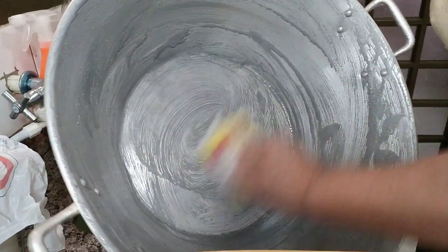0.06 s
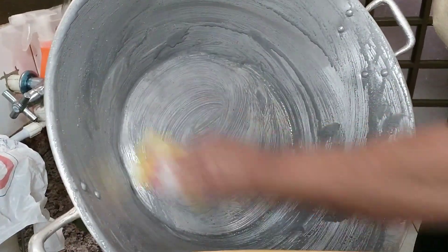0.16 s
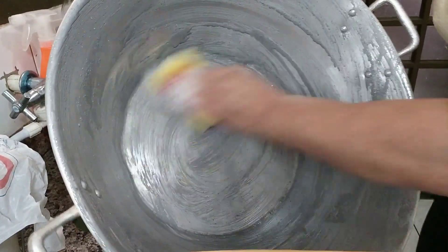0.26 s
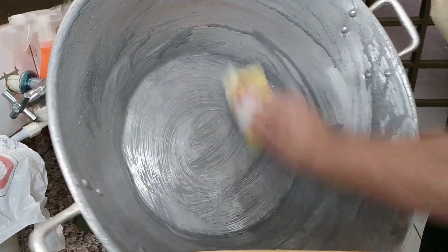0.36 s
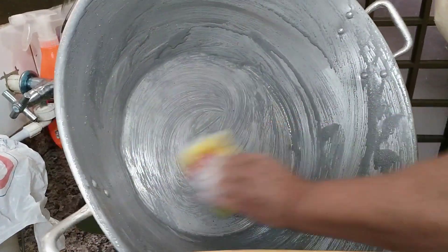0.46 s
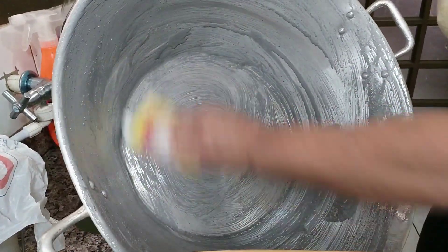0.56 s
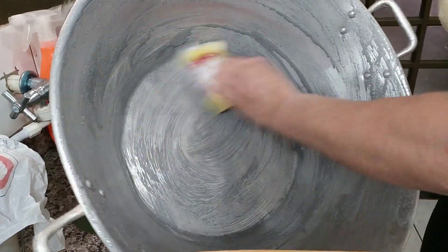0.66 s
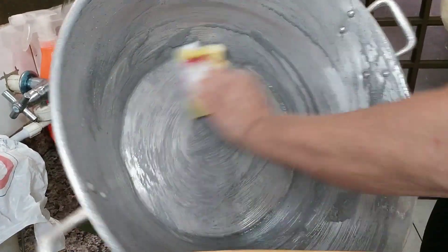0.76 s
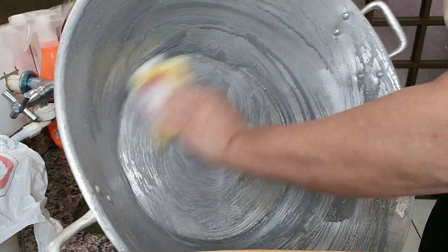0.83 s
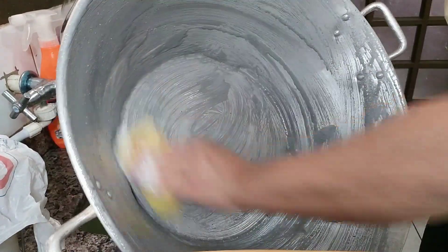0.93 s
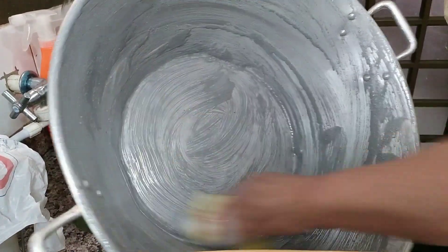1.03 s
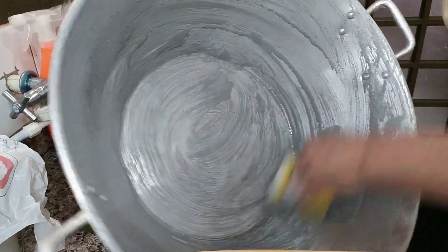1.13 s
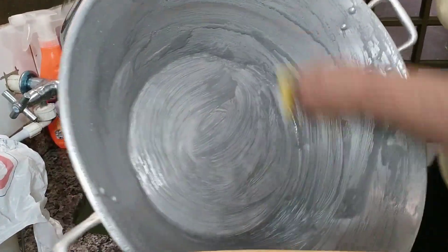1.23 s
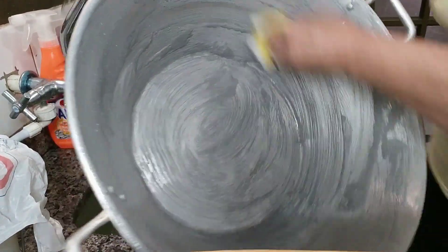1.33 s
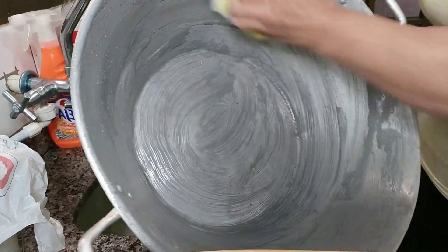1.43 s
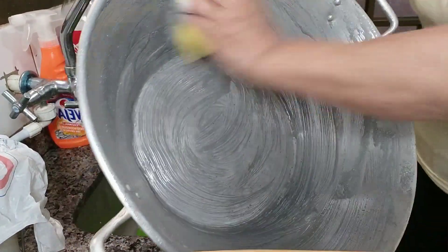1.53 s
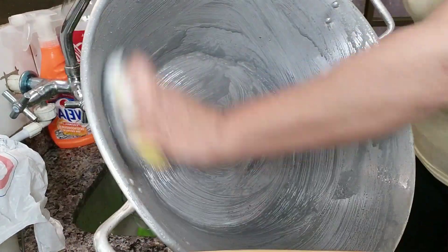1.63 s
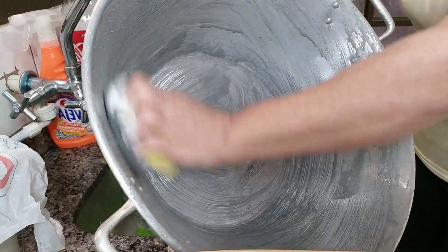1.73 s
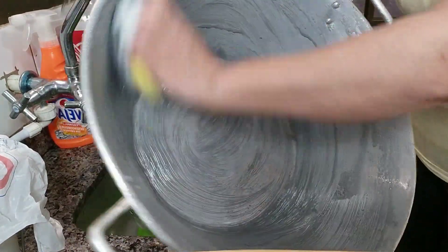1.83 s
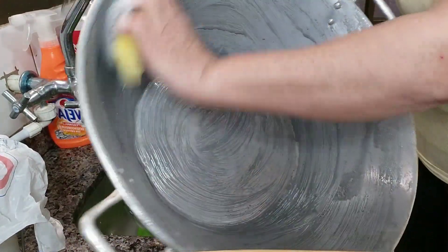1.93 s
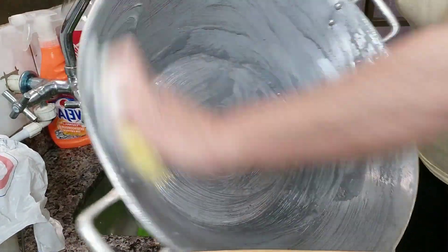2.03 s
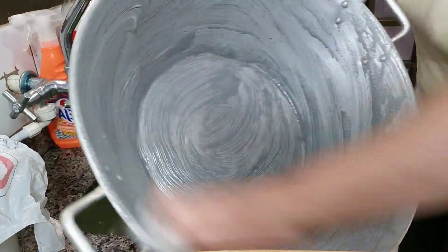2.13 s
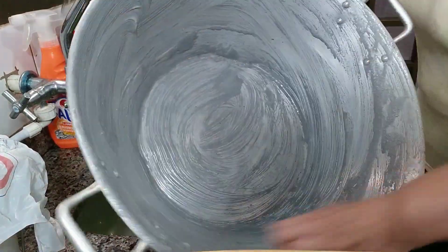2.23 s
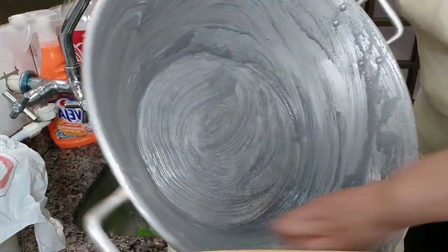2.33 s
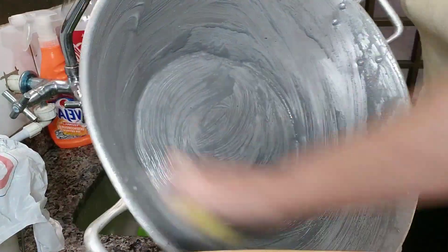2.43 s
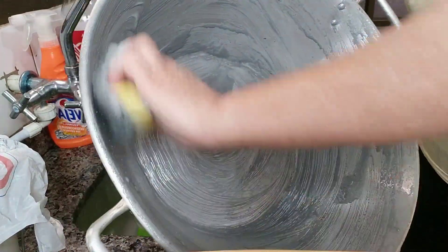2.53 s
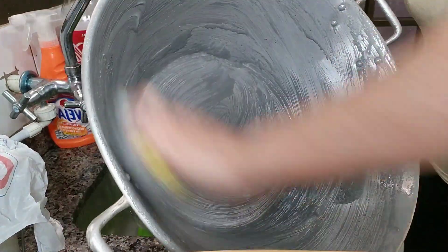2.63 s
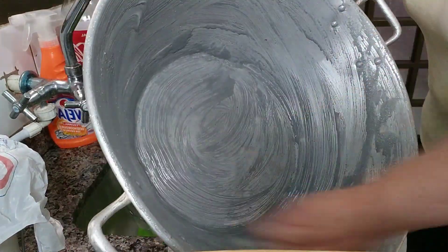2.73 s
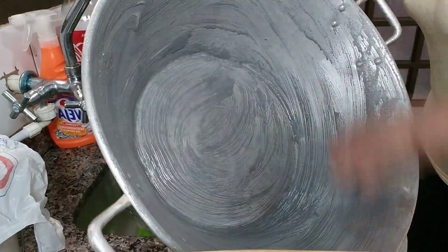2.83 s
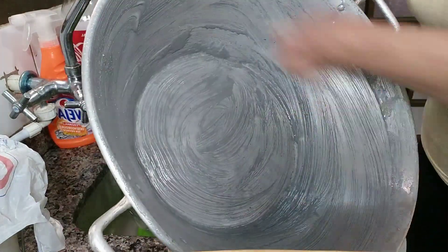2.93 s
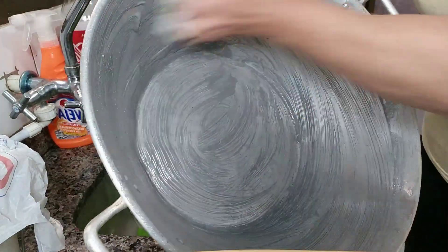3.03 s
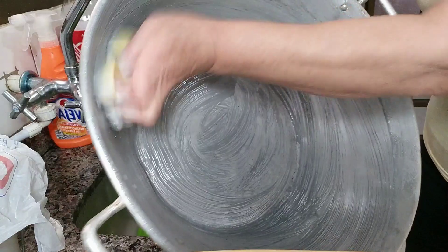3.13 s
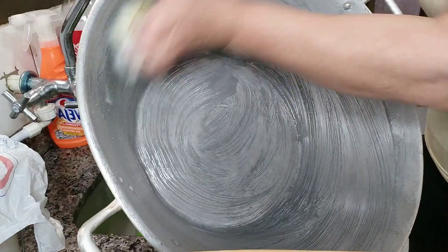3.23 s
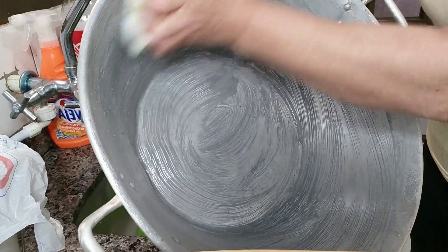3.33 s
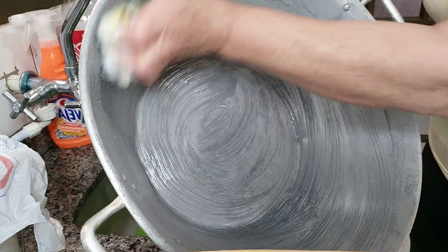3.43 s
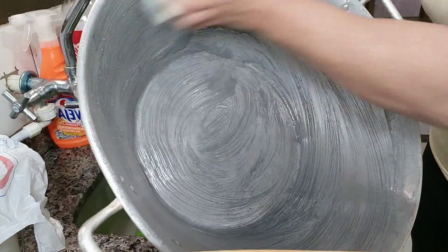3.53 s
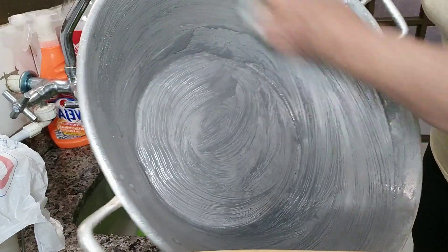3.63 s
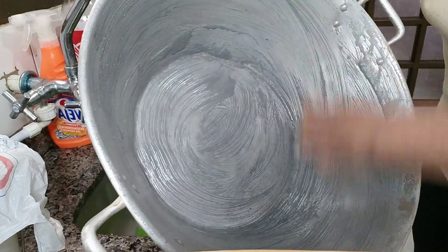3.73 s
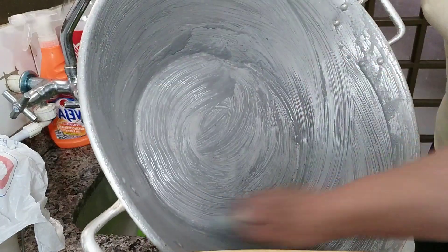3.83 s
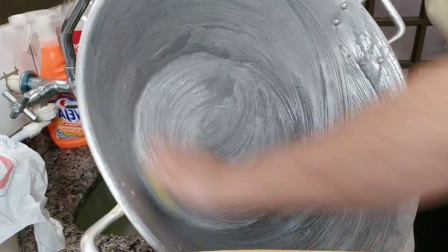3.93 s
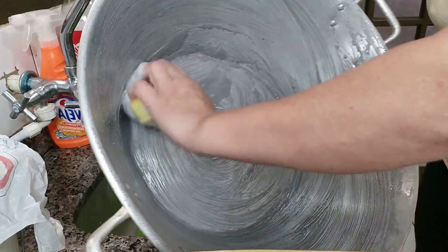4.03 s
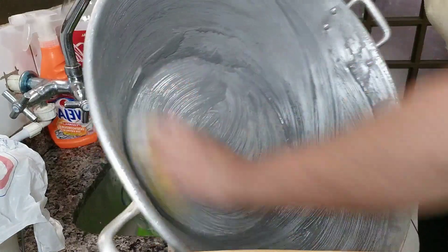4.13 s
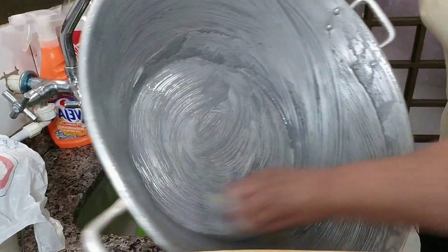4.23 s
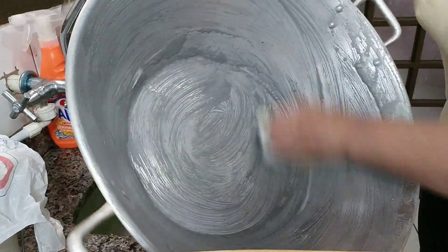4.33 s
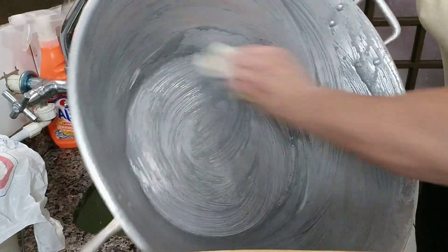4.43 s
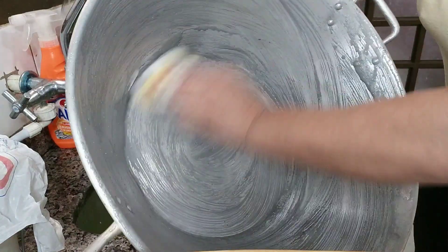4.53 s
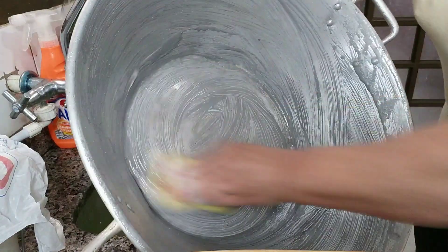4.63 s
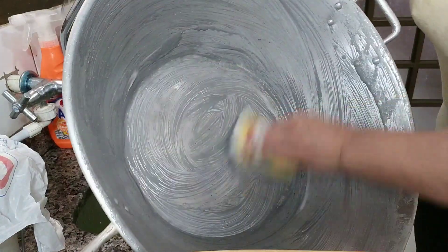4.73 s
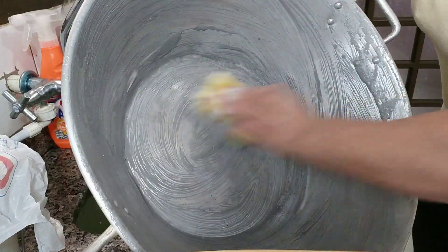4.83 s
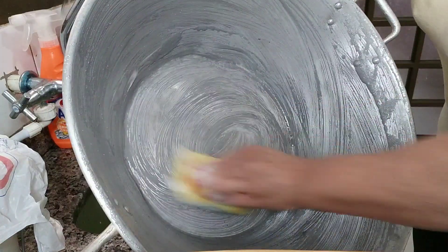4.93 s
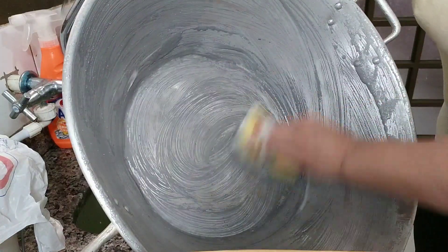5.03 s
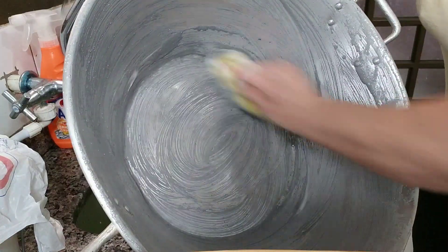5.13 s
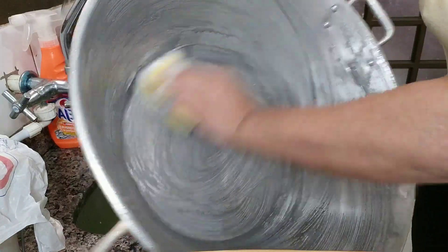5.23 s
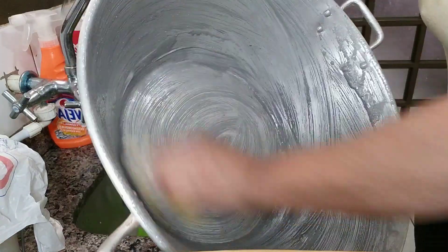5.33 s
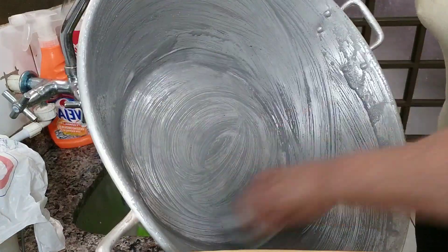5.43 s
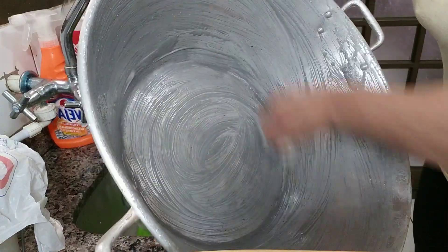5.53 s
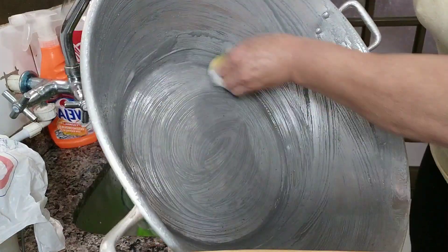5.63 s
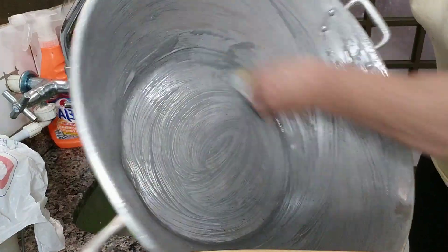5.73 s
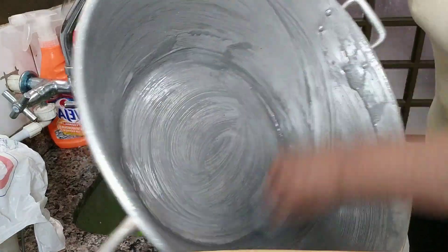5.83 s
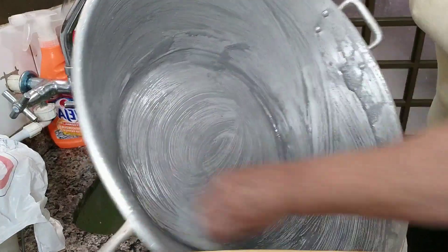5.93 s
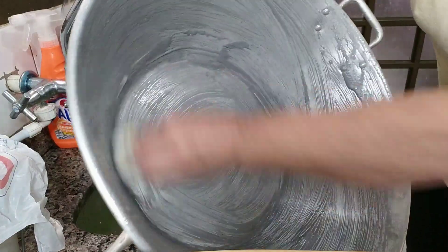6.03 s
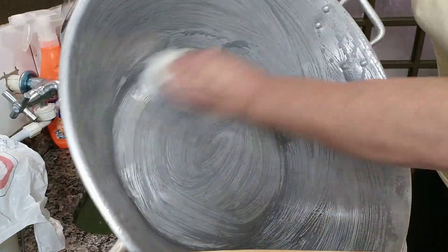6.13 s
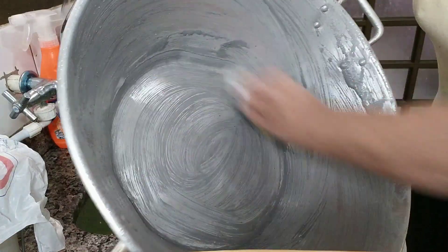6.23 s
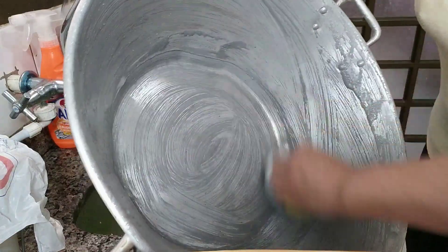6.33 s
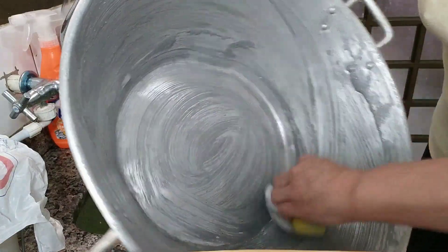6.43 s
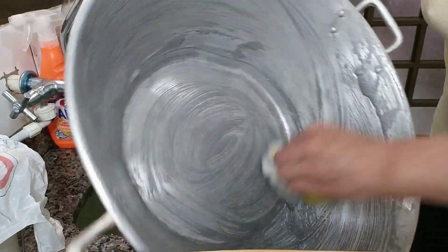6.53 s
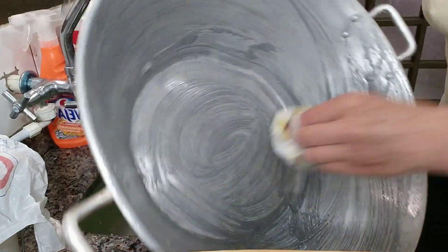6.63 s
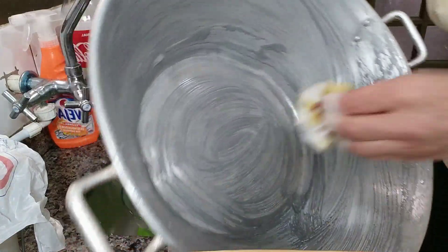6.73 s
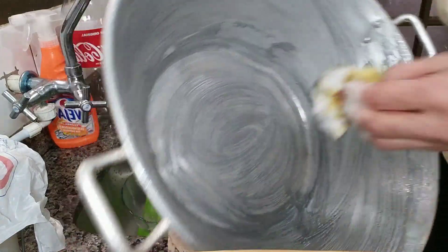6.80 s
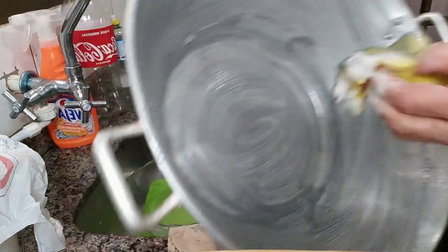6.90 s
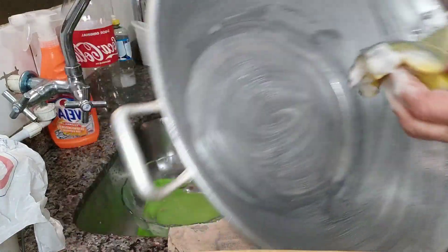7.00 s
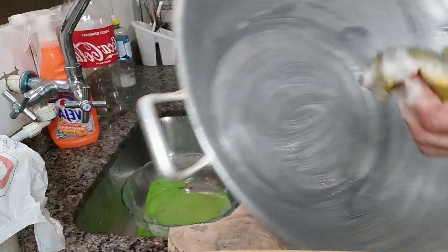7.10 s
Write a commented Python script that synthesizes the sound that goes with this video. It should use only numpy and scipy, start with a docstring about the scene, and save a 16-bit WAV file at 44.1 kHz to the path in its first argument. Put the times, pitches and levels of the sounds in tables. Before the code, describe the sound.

Close to the microphone in a small kitchen, a soapy scouring pad rubs the inside of a large aluminium pot in quick circles, about three a second. The bright, fibrous hiss stalls briefly as the hand turns. Metallic clanks ring early as the pot rocks on the sink, followed mostly by soft low bumps and scratchy flicks. At the end the rubbing stops abruptly, leaving faint brushes, a tiny squeak and quiet room hum.

```python
"""A kitchen sink with a big aluminium pot leaning in it, close to a two-port microphone.
A soapy scouring sponge circles inside: fibre noise hisses, rasps and scrapes, and stalls as the hand turns.
Hard strokes rock the pot so that its modes clank or bump against the sink; the pad snaps in bright flicks.
At the end the sponge lifts off: faint brushes, one squeak, then the quiet room of noise and hum."""
import sys
import numpy as np
from scipy import signal
from scipy.fft import rfft, irfft, next_fast_len
from scipy.io import wavfile
from scipy.ndimage import uniform_filter1d, map_coordinates

SR = 44100
rng = np.random.default_rng(int(sys.argv[2]) if len(sys.argv) > 2 else 0)


def master(y):
    """Save y as 16-bit WAV."""
    cut = np.clip(np.atleast_2d(y).T, -1, 1)
    pcm = np.round(cut * 32767)  # scale
    wavfile.write(sys.argv[1], SR, pcm.astype(np.int16))


N = 315756

# still air and distant machines, relative spectrum: pitch_hz [Hz], level_db [dB]
ROOM_COLOUR = [(25, -36), (42, -26), (68, 1.5), (130, -2.5), (240, 2.5), (480, 2.5), (640, -5.5),
               (800, 1.5), (1250, -3), (1400, 0), (1650, 1), (1950, -5), (2200, -13), (6000, -25.5),
               (15000, -24)]
# hum of an appliance: pitch_hz [Hz], level_db [dB rms]
HUM_TONES = [(60, -75), (171, -68), (1631, -63.5)]
# phase spread between the microphone ports: pitch_hz [Hz], side_minus_mid_db [dB]
PORT_WIDTH = [(100, -60), (500, -62), (900, -50), (1300, -42.5), (1900, -7.5), (2500, -38), (6300, -95.5),
              (7300, -88), (8800, -27.5), (10000, -7.5), (15000, -119)]
TOP_HZ = 15740  # upper limit of the microphone

# modes of the pot: pitch_hz [Hz], level_db [dB, relative], t60_s [s]
POT_MODES = [(86, -22, .3), (128, -16, .45), (220, -10, .15), (247, -5, .3), (339, -4, .33),
             (385, -12, .25), (425, -9, .28), (722, -12, .38), (829, -11, .33), (875, -11, .28),
             (917, -6, .35), (970, 3, .29), (1014, 0, .27), (1105, -11, .27), (1145, -2, .28),
             (1200, -10, .26), (1450, -15, .33), (1530, -15, .33), (1612, -9, .4), (1718, -9, .42),
             (1802, -8, .4), (1860, -6, .4), (2132, -16, .3), (2495, -14, .35), (2770, -13, .3),
             (2930, -10, .35), (3200, -14, .3), (3428, -13, .33), (4050, -12, .25)]
# the crowd of weaker modes between them, relative spectrum: pitch_hz [Hz], level_db [dB]
CLATTER_COLOUR = [(50, -38), (110, -8.5), (160, -32.5), (230, -4.5), (450, -4.5), (590, -17), (800, 2),
                  (1130, 2), (1350, -13.5), (1800, -0.5), (2250, -13), (4200, -8.5), (6500, -25),
                  (15000, -23.5)]
# how long those weaker modes last: pitch_hz [Hz], t60_s [s]
CLATTER_DECAY = [(100, 0.27), (1000, 0.52), (1800, 0.33), (4000, 0.18), (10000, 0.56)]
# resonances of the pot's hollow that colour all rubbing: centre_hz [Hz], width_hz [Hz], lift_db [dB]
HOLLOW_RESONANCES = [(241.4, 21, 15), (349, 26, 8), (723, 27, 7), (1095, 43, 11), (1866, 30, 7),
                     (2250, 10, 9.5), (2730, 37, 2.5), (3130, 50, 5), (3273, 47, 6), (3510, 62, 4.5),
                     (3793, 61, 7), (4040, 52, 5), (4530, 41, 3.5)]

# the pot shifts softly under the hand: start_s [s], spot_hz (most excited mode) [Hz], wall_db [dB], thud_db [dB]
SOFT_BUMPS = [(1.354, 339, -49.5, -53), (1.498, 247, -45.5, -54), (1.667, 339, -48, -59),
              (2.078, 339, -41, -47), (2.132, 247, -45, -55), (2.484, 339, -46.5, -65),
              (2.672, 339, -44.5, -56), (2.798, 225, -47, -64), (2.856, 247, -53, -64),
              (4.089, 339, -45, -77), (4.456, 220, -43, -43.5), (6.152, 332, -41.5, -60),
              (6.235, 247, -42.5, -61), (6.265, 339, -39, -62), (6.305, 339, -46, -59)]
# the pot strikes the sink: start_s [s], strength_db [dB], clang_db (base of the pot) [dB],
# contact_hz (hardness) [Hz], spot_hz (most excited mode) [Hz], lift_db (of that mode) [dB]
SINK_KNOCKS = [(0.105, -26.5, 9.5, 7940, 976, 5), (.434, -28.5, 9, 6200, 970, 4),
               (.772, -32.5, 10, 3800, 974, 1.5), (1.123, -29.5, 9.5, 4200, 974, 5),
               (2.353, -37.5, 8.5, 3880, 1106, 25.5), (4.402, -33, 2.5, 8000, 1110, -11),
               (5.837, -36.5, 4, 5800, 1103, 14)]
# registers of a knock, boom, clang, ring, clack and tick: lower_edge_hz [Hz], upper_edge_hz [Hz]
KNOCK_REGISTERS = [(60, 600), (600, 1350), (1350, 2200), (2200, 6000), (6000, 15000)]
BOOM_DB, RING_DB, CLACK_DB, TICK_DB = 0.04, 5, 5, 4  # relative levels for a perfectly hard contact
BOOM_RISE_S = 0.0035  # the pot's whole body is slower to move than the struck spot
# the pot touches a second time
REBOUND_S, REBOUND_HALF_S, REBOUND = .008, .0021, .26  # delay s, half length s, strength (gain)
# the pad catches and snaps free: start_s [s], level_db (before a common lift) [dB]
PAD_SNAPS = [(1.61, -30), (1.825, -27), (2.79, -25.5), (3.725, -27.5), (4.288, -24), (4.464, -31),
             (4.665, -28), (5.486, -26), (6.212, -31)]

# relative spectra of the rubbing: pitch_hz [Hz], level_db [dB]
HISS_COLOUR = [(3000, -41), (5200, -1.5), (6500, -2), (8200, -1.5), (9700, 1.5), (11000, 0.8), (12300, 2.5),
               (13300, -5), (15700, -10)]
RASP_COLOUR = [(1500, -32), (2600, -8), (3300, -5.5), (3800, -2.5), (4400, -1), (5200, -6.5), (6200, -13.5),
               (9000, -17.5)]
SCRAPE_COLOUR = [(40, -30), (160, -12), (240, -12), (440, 1), (590, -4.5), (720, 3), (950, 0), (1100, 0.5),
                 (1270, 2.5), (1550, 5), (2300, 4.5), (3200, -4.5), (5000, -22.5)]
# top of the hiss under firm pressure, relative spectrum: pitch_hz [Hz], level_db [dB]
FIZZ_COLOUR = [(10000, -46), (12500, -9), (13500, 8), (15700, 7)]
# how hard the arm works: start_s [s], effort_db [dB], flat_db (extra drag of the pad lying flat) [dB]
ARM_EFFORT = [(0.0, 0.5, -3.5), (.17, -0.5, 2.5), (.5, 0.8, -3), (.85, -3.5, 2.5), (1.12, 1.1, 0.5),
              (1.45, -3.5, 1.5), (1.62, 0.5, 1.5), (1.92, -3.7, -5), (2.15, -2.5, 1.5), (2.55, -2.5, -2),
              (2.87, 4, -2), (3.46, -4, -4.5), (3.85, 4.5, -0.5), (4.1, -3.5, 0), (4.35, 0, 0.4),
              (5.4, 0.55, 0), (6.18, 1.3, 2.5), (6.37, -2.5, -1)]
# the hand stalls as it turns round: centre_s [s], depth_db [dB], regain_s (time to half depth) [s]
HAND_TURNS = [(.72, -13.5, 0.012), (1.72, -7.5, 0.035), (2.31, -7, 0.046), (2.58, -6.5, 0.017),
              (3.172, -7.5, .018), (3.308, -7.5, 0.0083), (3.424, -9, 0.01), (4.06, -6, 0.01),
              (5.675, -12.5, 0.023)]
# light brushes as the pad is taken out: centre_s [s], half_length_s [s], hiss_db [dB], rasp_db [dB]
EXIT_BRUSHES = [(6.638, 0.11, -63.5, -57.5), (7.07, 0.13, -60, -70.5)]
HISS_DB, RASP_DB, SCRAPE_DB = -35, -37.5, -43  # ordinary stroke, before the hollow colours it
RASP_GROWS, SCRAPE_GROWS = 0.45, 0.42  # dB for each dB of effort; the hiss follows it fully
RASP_STALLS, SCRAPE_STALLS = 0.58, 0.67  # share of each stall's depth that the lower voices take
CIRCLE_S, PUSH_S, PUSH_DB = .335, 0.14, 0.5  # one circle of the hand, first outward push, its swell
HISS_PUSHED = 0.47  # share of that swell which the hiss takes
LIFT_S, LIFT_DB_PER_S, HISS_LIFTS = 6.383, 143, 1.27  # the pad leaves; its hiss fades this much faster
GRIP_DB = 0.9  # slow chance straying of the rubbing


def amp(db):
    """Decibels to gain."""
    return 10 ** (np.asarray(db) / 20)


def unit(x, count=None):
    """x scaled to rms 1 over its first count samples."""
    return x / np.sqrt(np.mean(x[:count] ** 2) + 1e-20)


def along(points, hz):
    """(Hz, value) points read on a log frequency axis."""
    f, v = np.transpose(points)
    return np.interp(np.log(hz + 1), np.log(f + 1), v)


def peak(x, centre, width):
    """A resonance curve of height 1, width across at half height."""
    return 1 / (1 + (2 * (x - centre) / width) ** 2)


def filtered(x, response):
    """x times a response of frequency."""
    n = x.shape[-1]
    m = next_fast_len(n + SR // 2)
    spectrum = rfft(x, m) * response(np.fft.rfftfreq(m, 1 / SR))
    return irfft(spectrum, m)[..., :n]


def coloured(x, spectrum):
    """x shaped by a spectrum, at rms 1."""
    return unit(filtered(x, lambda hz: amp(along(spectrum, hz))))


def band(x, lo_hz, hi_hz):
    """Causal band-pass."""
    edges = [lo_hz, min(hi_hz, SR / 2 - 1)]
    return signal.sosfilt(signal.butter(3, edges, "band", fs=SR, output="sos"), x)


def wobble(rate):
    """A smooth random curve, rate knots a second."""
    knots = rng.standard_normal(int(N * rate / SR) + 4)
    return map_coordinates(knots, [np.arange(N) * rate / SR])


def add(track, s, sound):
    """Mix a sound into the track at time s."""
    part = track[round(s * SR):][:len(sound)]
    part += sound[:len(part)]


def kitchen():
    """Quiet room: shaped air noise and steady hum tones whose phase drifts slightly."""
    t = np.arange(N) / SR
    hum = np.zeros(N)
    for hz, db in HUM_TONES:
        hum += amp(db) * np.sqrt(2) * np.sin(2 * np.pi * hz * t + 0.28 * wobble(3.0))
    return hum + amp(-53.5) * coloured(rng.standard_normal(N), ROOM_COLOUR)


def squeak(s=6.972, half_length_s=0.012, pitch_hz=1400, db=-53):
    """One faint wet squeak as the pot is lifted: a short tone of wavering pitch."""
    t = np.arange(N) / SR - s
    phase = 2 * np.pi * np.cumsum(pitch_hz * (1 + 0.023 * wobble(250))) / SR
    return amp(db) * np.exp(-(t / half_length_s) ** 2) * np.sqrt(2) * np.sin(phase)


def pot_ring(t, vary_db, spot_hz=0, spot_db=0):
    """The pot's decaying modes; the spot that is touched changes the level of those near spot_hz."""
    hz, db, t60 = np.transpose(POT_MODES)[:, :, None]
    db = db + spot_db * peak(hz, spot_hz, 32) + vary_db * rng.standard_normal(db.shape)
    return np.sum(amp(db - 60 * t / t60) * np.sin(2 * np.pi * hz * t), axis=0)


def blow(spot_hz, spot_db, clatter_db, crash_db, crash_t60, attack):
    """One blow on the pot: clear modes, dense weak modes, and the crash and rebound of the contact."""
    t = np.arange(SR * 3 // 4) / SR
    # each frequency of the clatter dies at its own pace
    hz, times, z = signal.stft(coloured(rng.standard_normal(len(t)), CLATTER_COLOUR), SR, nperseg=256)
    decay = amp(-60 * times / along(CLATTER_DECAY, hz)[:, None])
    clatter = signal.istft(z * decay, SR, nperseg=256)[1][:len(t)]
    rebound = REBOUND * np.exp(-((t - REBOUND_S) / REBOUND_HALF_S) ** 2)
    crash = coloured(rng.standard_normal(len(t)), CLATTER_COLOUR) * (amp(-60 * t / crash_t60) + rebound)
    ring = pot_ring(t, 1.0, spot_hz, spot_db)
    onset = 1 - np.exp(-t / attack)
    return (ring + amp(clatter_db) * clatter + amp(crash_db) * crash) * onset


def bumps():
    """Soft contacts: only the pot's low modes sound, with a dull thud pushed into the sink."""
    out, t = np.zeros(N), np.arange(SR // 4) / SR
    thud_colour = [(45, -42), (75, -2), (135, 10), (190, 0.5), (300, -22)]  # pitch_hz, level_db
    for s, spot_hz, wall_db, thud_db in SOFT_BUMPS:
        hit = blow(spot_hz, spot_db=11.0, clatter_db=8, crash_db=2.5, crash_t60=0.39, attack=0.0038)
        hit = hit[:len(t)] * amp(-60 * t / 0.43)  # the hand damps the wall further
        wall = unit(band(hit, 156, 440), count=1764)
        thud = coloured(rng.standard_normal(len(t)), thud_colour)
        thud = unit(thud * np.exp(-((t - .024) / 0.029) ** 2), count=1764)
        add(out, s - .004, amp(wall_db) * wall)  # both begin 4 ms ahead of the listed time
        add(out, s - .004, amp(thud_db) * thud)
    return out


def knocks():
    """The pot rocks onto the sink's edge; the harder the contact, the more of its upper range rings."""
    out = np.zeros(N)
    for s, strength_db, clang_db, contact_hz, spot_hz, lift_db in SINK_KNOCKS:
        hit = blow(spot_hz, lift_db, clatter_db=4.0, crash_db=10.0, crash_t60=.085, attack=0.001)
        parts = [band(hit, lo, hi) for lo, hi in KNOCK_REGISTERS]
        parts[0] = parts[0] * (1 - np.exp(-np.arange(len(hit)) / SR / BOOM_RISE_S))
        levels_db = [BOOM_DB, clang_db, RING_DB, CLACK_DB, TICK_DB]
        for part, db, (lo, hi) in zip(parts, levels_db, KNOCK_REGISTERS):
            softened = 1 / np.hypot(1, lo * hi / contact_hz ** 2)
            add(out, s, amp(strength_db + db) * softened * unit(part, count=1764))
    return out


def snaps():
    """The pad catches and snaps free: a bright flick of noise that dies quickly in the pot."""
    out, t = np.zeros(N), np.arange(SR // 8) / SR
    flick_colour = [(1200, -33), (3000, 4.5), (4500, 10), (7000, 4.0), (11000, 6.5), (15500, -2.5)]
    for s, db in PAD_SNAPS:
        flick = coloured(rng.standard_normal(len(t)), flick_colour)
        add(out, s, amp(db + 2.5 - 60 * t / 0.1) * (1 - np.exp(-t / 0.0003)) * flick)
    return out


def hand():
    """Hiss, rasp and scrape levels in dB: effort and circles swell them, turns stall, lifting ends them."""
    t = np.arange(N) / SR
    s, *columns = np.transpose(ARM_EFFORT)
    effort_db, flat_db = (np.interp(t, s, v) for v in columns)
    push_db = PUSH_DB * np.cos(2 * np.pi * (t - PUSH_S) / CIRCLE_S)
    stall_db = sum(db * peak(t, at, 2 * regain) for at, db, regain in HAND_TURNS)
    lift_db = -LIFT_DB_PER_S * np.maximum(t - LIFT_S, 0)
    hiss = amp(HISS_DB + effort_db + HISS_PUSHED * push_db + stall_db + HISS_LIFTS * lift_db)
    rasp = amp(RASP_DB + RASP_GROWS * effort_db + push_db + RASP_STALLS * stall_db + lift_db)
    scrape_db = SCRAPE_DB + SCRAPE_GROWS * effort_db + flat_db
    scrape_db = scrape_db + push_db + SCRAPE_STALLS * stall_db + lift_db
    for at, half_length, hiss_db, rasp_db in EXIT_BRUSHES:
        touch = np.exp(-((t - at) / half_length) ** 2)
        hiss = np.hypot(hiss, amp(hiss_db) * touch)
        rasp = np.hypot(rasp, amp(rasp_db) * touch)
    return 20 * np.log10(hiss), 20 * np.log10(rasp), scrape_db


def fibres(per_second, patchy_db):
    """Countless tiny slips, whose colour shifts as the pad travels along the wall."""
    slips = np.sqrt(rng.poisson(per_second / SR, N)) * rng.standard_normal(N)
    z = signal.stft(slips, nperseg=1024)[2]
    # random patches, smoothed over frequency and then over time
    field = uniform_filter1d(rng.standard_normal(z.shape), size=5, axis=0)
    field = uniform_filter1d(field, size=14, axis=1)
    return signal.istft(z * amp(patchy_db * unit(field)), nperseg=1024)[1][:N]


def sponge():
    """Fibres slip on the wet metal; the pad's drag also sets the wall ringing."""
    hiss_db, rasp_db, scrape_db = hand()
    grip_db = GRIP_DB * wobble(25) + 0.11 * wobble(180)  # the pad grips unevenly
    slips = fibres(per_second=60000, patchy_db=1.0)
    hiss = amp(hiss_db) * coloured(slips, HISS_COLOUR)
    pressure_db = .25 * (hiss_db - hiss_db.mean())  # the fizz needs pressure
    fizz = amp(hiss_db - 8.0 + pressure_db + 0.38 * wobble(10)) * coloured(slips, FIZZ_COLOUR)
    rasp_noise = coloured(fibres(per_second=20000, patchy_db=2.0), RASP_COLOUR)
    rasp = amp(rasp_db + 0.23 * wobble(22)) * rasp_noise
    scrape = coloured(fibres(per_second=15000, patchy_db=1.6), SCRAPE_COLOUR)
    ring = pot_ring(np.arange(SR // 2) / SR, 1)
    wall = unit(signal.fftconvolve(rng.standard_normal(N), ring)[:N])
    drag = amp(scrape_db) * (amp(1.4 * wobble(18)) * scrape + amp(-20.0 + 3.2 * wobble(9.3)) * wall)
    rubbing = amp(grip_db) * (hiss + fizz + rasp + drag)

    def hollow(hz):
        """Gain of the pot's hollow: its resonances' lifts summed in dB."""
        return amp(sum(db * peak(hz, centre, width) for centre, width, db in HOLLOW_RESONANCES))

    return filtered(rubbing, hollow)


def scene():
    """All sounds come from straight ahead; the two ports have equal levels but opposite phase shifts."""
    mid = kitchen() + squeak() + bumps() + knocks() + snaps() + sponge()
    side = filtered(mid, lambda hz: 1j * amp(along(PORT_WIDTH, hz)))
    return np.array([mid + side, mid - side])


def record(dry):
    """The microphone keeps nothing above its band limit."""
    return filtered(dry, lambda hz: hz < TOP_HZ)


dry = scene()
out = record(dry)
master(out)
```